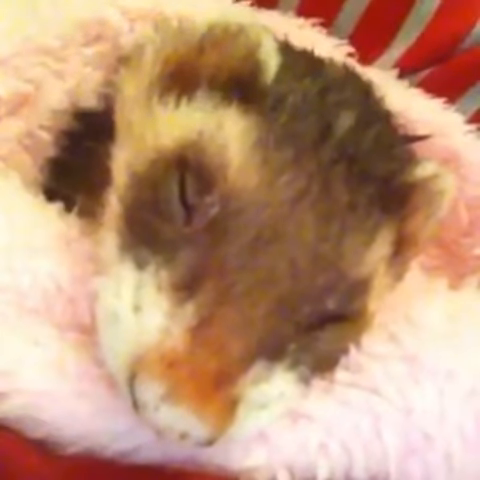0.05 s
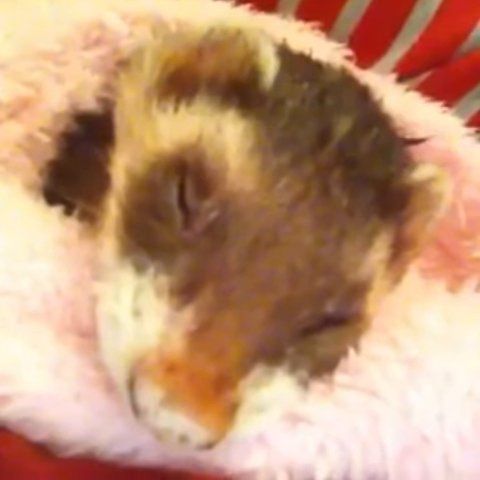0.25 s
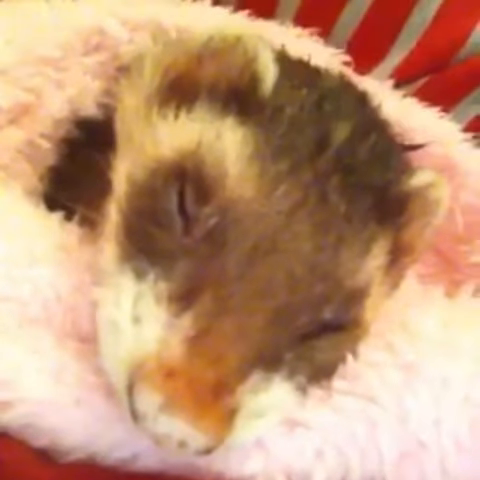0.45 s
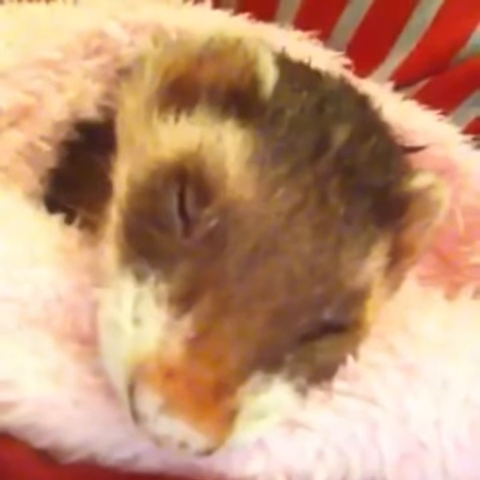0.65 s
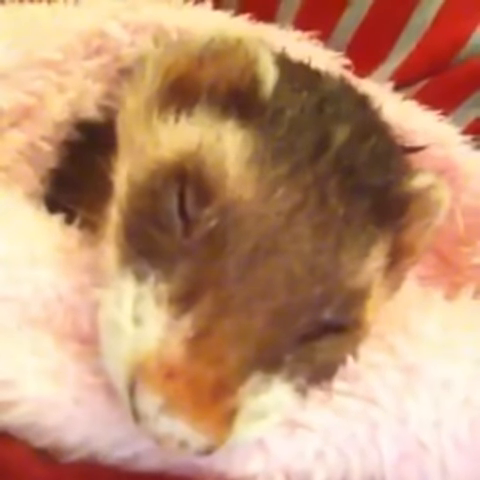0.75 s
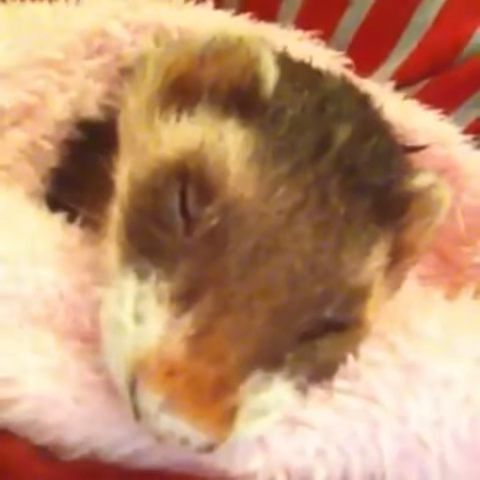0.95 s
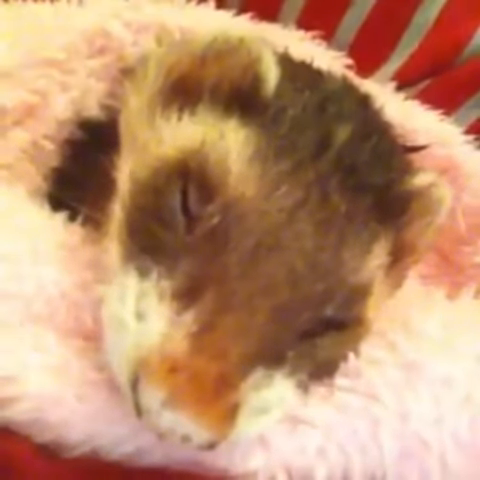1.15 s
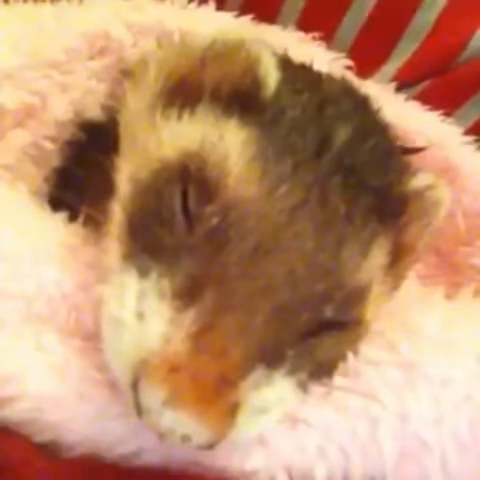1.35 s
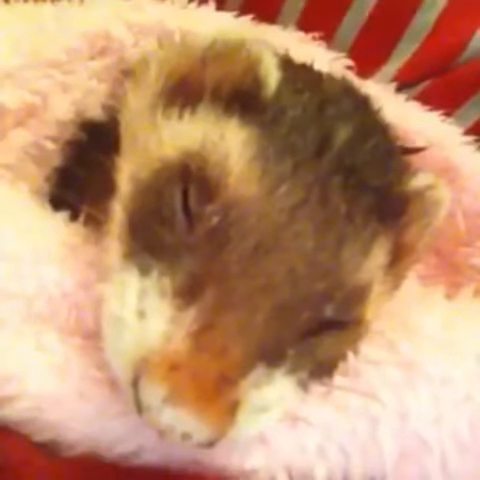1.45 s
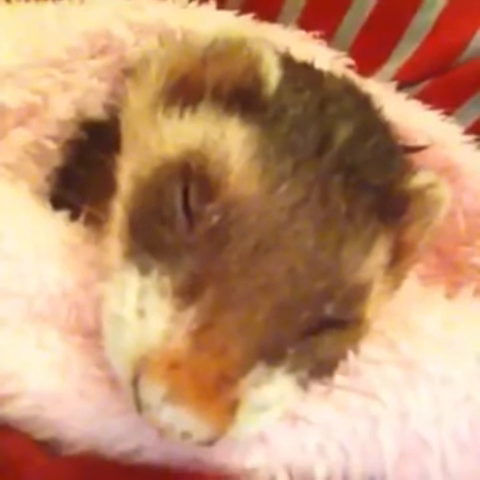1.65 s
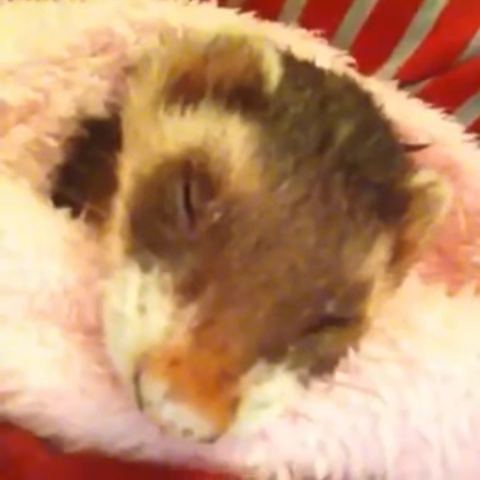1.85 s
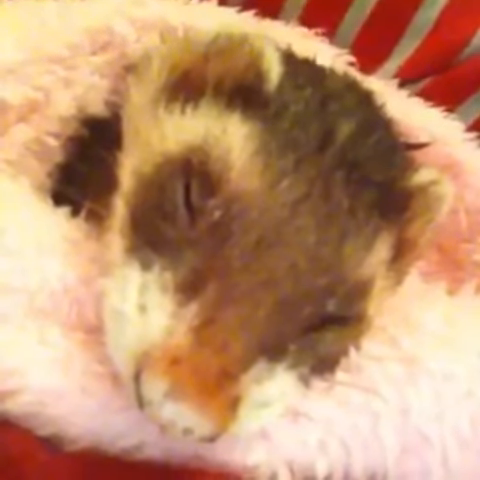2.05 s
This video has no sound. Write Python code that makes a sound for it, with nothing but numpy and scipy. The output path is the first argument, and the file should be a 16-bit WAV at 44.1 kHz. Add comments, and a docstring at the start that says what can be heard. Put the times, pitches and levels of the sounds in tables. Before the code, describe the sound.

Two soft, close snores come from a sleeping ferret, about a second apart, raspy and fluttering with tiny squeaks and nasal whistles. The second is longer and ends with a faint wet tick. Low hum and hiss continue indoors.

```python
"""Two small, close snores from a ferret asleep in its blanket, over a quiet room's mains hum and hiss.
Each starts as a short buzz of soft airway tissue, breaks into uneven flaps and squeaks, and ends
in a thin nasal whistle: falling the first time, rising and interrupted the second.
Air rasps and hisses through the nose; a faint wet tick and a small low rustle follow the last whistle."""
import sys
import numpy as np
from scipy import signal
from scipy.fft import rfft, irfft
from scipy.io import wavfile

SR = 44100
rng = np.random.default_rng(int(sys.argv[2]) if len(sys.argv) > 2 else 0)


def digitize_waveform(pressure):
    """Quantize a signal to 16-bit integers and store it at the path in sys.argv[1].

    Rows of a 2-D input are taken as channels; values are limited to [-1, 1].
    """
    field = np.atleast_2d(pressure).T
    bounded = np.clip(field, -1, 1)
    quanta = np.round(bounded * 32767).astype(np.int16)
    wavfile.write(sys.argv[1], SR, quanta)


N = 92610


def from_db(db):
    """Decibels to gain."""
    return 10 ** (np.asarray(db) / 20)


def unit_rms(x):
    """Scale to unit power."""
    return x / np.sqrt(np.mean(x ** 2) + 1e-20)


def drift(rate_hz):
    """Smooth random wander, unit RMS."""
    pole = np.exp(-2 * np.pi * rate_hz / SR)
    wander = signal.lfilter([1], [1, -2 * pole, pole * pole], rng.standard_normal(N + SR))
    return unit_rms(wander[SR:])


def gate(start_s, length_s, attack_s, release_s):
    """Rounded attack, hold, rounded release."""
    age_s = np.arange(N) / SR - start_s
    ramp = np.clip(np.minimum(age_s / attack_s, (length_s - age_s) / release_s), 0, 1)
    return np.sin(np.pi / 2 * ramp) ** 2


def progress(start_s, length_s):
    """0 to 1 over an event."""
    return np.clip((np.arange(N) / SR - start_s) / length_s, 0, 1)


def glide(start_s, length_s, from_hz, to_hz, arch_hz):
    """Pitch slide, bowed as the pressure swells and eases."""
    u = progress(start_s, length_s)
    return from_hz + (to_hz - from_hz) * u + arch_hz * np.sin(np.pi * u)


def noise(spectrum):
    """Unit-RMS noise shaped by rows of freq_hz, gain_db."""
    freq_hz, gain_db = np.transpose(spectrum)
    bins_hz = np.maximum(np.arange(N // 2 + 1) * SR / N, 1)
    gain = from_db(np.interp(np.log(bins_hz), np.log(freq_hz), gain_db))
    return unit_rms(irfft(rfft(rng.standard_normal(N)) * gain, N))


def vibration(pitch_hz, harmonics_db, jitter, shimmer_db, drift_hz):
    """Tissue oscillating in the airflow, unsteady in pitch and strength."""
    phase = 2 * np.pi * np.cumsum(pitch_hz * (1 + jitter * drift(drift_hz))) / SR
    wave = sum(from_db(db) * np.cos(k * phase) for k, db in enumerate(harmonics_db, 1))
    return np.sqrt(2) * wave * from_db(shimmer_db * drift(drift_hz))


def room():
    """Steady mains hum and room noise."""
    # mains lines: freq_hz, level_db
    lines = [(100, -64), (120, -78.5), (200, -75), (300, -67.5)]
    # room noise spectrum: freq_hz, gain_db
    spectrum = [(60, -19.5), (95, -11.5), (140, -10.5), (200, -4), (280, 2), (340, -3.5), (490, -6.5),
                (620, -11), (780, -11.5), (1150, -12), (1600, -16), (2200, -17.5), (3000, -20.5),
                (4200, -23), (7000, -24.5), (10000, -24)]
    t = np.arange(N) / SR
    hum = sum(np.sqrt(2) * from_db(db) * np.sin(2 * np.pi * (hz * t + rng.random())) for hz, db in lines)
    low_cut = signal.butter(1, 68.4, "high", fs=SR, output="sos")
    return hum + signal.sosfilt(low_cut, from_db(-56.5) * noise(spectrum))


def nostril_hiss(fade_db=-4.5):
    """Smooth, lingering turbulence at the nostrils."""
    # hisses: start_s, length_s, level_db
    hisses = [(0.225, .16, -59), (1.323, .52, -63)]
    # hiss spectrum: freq_hz, gain_db
    spectrum = [(1000, -6), (2000, -11.5), (3500, 2.5), (5500, 3.5), (7500, -2.5), (10000, 3)]
    envelope = np.zeros(N)
    for start_s, length_s, level_db in hisses:
        gain = from_db(level_db + fade_db * progress(start_s, length_s))
        envelope += gain * gate(start_s, length_s, attack_s=0.013, release_s=0.013)
    return envelope * noise(spectrum)


def buzzes():
    """Tissue vibrates evenly: the reedy start of each snore."""
    # buzzes: start_s, length_s, pitch_hz, level_db, slope_db_per_harmonic
    events = [(0.234, 0.031, 431, -44, -0.5), (1.3253, 0.0237, 589, -45, -3.5)]
    # harmonics before the slope: gain_db
    base_db = [1.3, -1.5, -17, -27, -36]
    out = np.zeros(N)
    for start_s, length_s, pitch_hz, level_db, slope_db in events:
        glide_hz = glide(start_s, length_s, pitch_hz, pitch_hz, arch_hz=10)
        harmonics_db = base_db + slope_db * np.arange(len(base_db))
        tone = vibration(glide_hz, harmonics_db, jitter=0.0046, shimmer_db=2.6, drift_hz=99)
        out += from_db(level_db) * gate(start_s, length_s, attack_s=0.007, release_s=0.0023) * tone
    return out


def rasp(flutter_db=2.0):
    """Air drawn through the nose, chopped by the moving tissue."""
    # breaths: start_s, length_s, level_db
    breaths = [(0.256, 0.21, -59.5), (1.318, 0.24, -57.5), (1.512, 0.19, -58.5)]
    # rasp spectrum: freq_hz, gain_db
    spectrum = [(60, -25), (170, -7), (340, 3), (530, -7), (850, -7), (1200, -3.5), (1600, -15.5),
                (2200, -14), (3200, -22), (10000, -31)]
    envelope = sum(from_db(level_db) * gate(start_s, length_s, attack_s=0.013, release_s=0.057)
                   for start_s, length_s, level_db in breaths)
    return envelope * noise(spectrum) * from_db(flutter_db * drift(rate_hz=130))


def squeaks():
    """The narrowed airway sounds short glides among the flaps."""
    # squeaks: start_s, length_s, from_hz, to_hz, arch_hz, level_db, overtone_db
    events = [(.265, .0085, 830, 1070, -5, -40.5, -21), (0.27, 0.0062, 1150, 1100, 28, -49, -25),
              (.301, .017, 730, 792, -6, -39, -18.5), (0.323, 0.013, 850, 840, 24, -38.5, -23.5),
              (0.345, .013, 820, 960, 71, -44, -19), (1.347, 0.0059, 860, 920, 3, -39.5, -19.5),
              (1.354, 0.0237, 1053, 940, 217, -47, -16), (1.3706, 0.0103, 950, 774, 0, -37, -28),
              (1.387, .007, 820, 877, 2, -49, -25), (1.456, 0.014, 1342, 1280, 0, -52, -22),
              (1.4943, 0.0085, 850, 994, 43, -41, -21)]
    out = np.zeros(N)
    for start_s, length_s, from_hz, to_hz, arch_hz, level_db, overtone_db in events:
        pitch_hz = glide(start_s, length_s, from_hz, to_hz, arch_hz)
        tone = vibration(pitch_hz, [0, overtone_db], jitter=0.011, shimmer_db=1.7, drift_hz=243)
        out += from_db(level_db) * gate(start_s, length_s, attack_s=0.0023, release_s=0.0023) * tone
    return out


def swells(times_s, levels_db, modes, spread_db=1.5, detune=0.056):
    """A Gaussian tone burst per mode at each time, never quite alike."""
    t, out = np.arange(N) / SR, np.zeros(N)
    for centre_s, level_db in zip(times_s, levels_db):
        near = np.abs(t - centre_s) < 0.015
        lag_s = t[near] - centre_s
        for mode_hz, gain_db, sigma_s in modes:
            peak = from_db(level_db + gain_db + spread_db * rng.standard_normal())
            freq_hz = mode_hz * (1 + detune * rng.standard_normal())
            envelope = peak * np.exp(-0.5 * (lag_s / sigma_s) ** 2)
            out[near] += envelope * np.cos(2 * np.pi * (freq_hz * lag_s + rng.random()))
    return out


def flaps_and_rustle():
    """Soft tissue flaps during the snores, then one small low rustle after the last whistle."""
    # flaps, with the rustle in the last row: time_s, low_db, high_db
    events = [(0.27, -39, -55), (.2760, -37, -41), (0.2809, -38, -44), (0.2916, -38.5, -35),
              (0.298, -38, -44), (0.301, -44, -45), (0.312, -43, -35.5), (0.32, -46, -40),
              (0.326, -39, -61), (0.338, -39, -51), (0.343, -54, -41.5), (.3540, -45, -47),
              (.3635, -72, -46.5), (0.3714, -42.5, -41.5), (0.38, -49, -51), (1.354, -43, -42),
              (1.3625, -40.5, -44), (1.376, -45, -50), (1.3825, -43, -43), (1.3899, -43, -37),
              (1.4014, -34.5, -45), (1.4145, -50, -39), (1.419, -38, -43), (1.427, -43, -52),
              (1.438, -41.5, -44), (1.4474, -56, -41), (1.4519, -36, -43), (1.4583, -41.5, -39),
              (1.474, -43, -56), (1.485, -43, -52), (1.496, -47, -49), (1.503, -41.5, -64),
              (1.5159, -43, -55), (1.691, -48, -54), (1.789, -42, -59)]
    # low and high resonances: freq_hz, gain_db, sigma_s
    low_modes = [(351, -1, 0.0014)]
    high_modes = [(775, 0.5, 0.0018), (1023, -8, 0.0015), (2160, -19.5, 0.0008)]
    times_s, low_db, high_db = np.transpose(events)
    return swells(times_s, low_db, low_modes) + swells(times_s, high_db, high_modes)


def whistles(tremble_hz=93.5, depth_db=1.5):
    """Nearly pure tones as the flow eases, trembling with the loose tissue."""
    # whistles: start_s, length_s, from_hz, to_hz, arch_hz, level_db, fade_db, release_s
    events = [(0.3729, 0.0653, 854, 603, -6.5, -42.5, -3, 0.033),
              (1.5221, 0.072, 871, 904, -28, -44.5, 0, 0.008),
              (1.593, 0.033, 870, 999, 1, -44.5, -3, 0.006), (1.625, 0.024, 932, 1017, -1, -46, -8, 0.0091),
              (1.648, .02, 953, 914, -7, -45.5, -1, .005)]
    # harmonics: gain_db
    harmonics_db = [0, -24]
    rate_hz = tremble_hz * (1 + 0.15 * drift(rate_hz=30))
    tremble_db = depth_db * np.sin(2 * np.pi * np.cumsum(rate_hz) / SR)
    out = np.zeros(N)
    for start_s, length_s, from_hz, to_hz, arch_hz, level_db, fade_db, release_s in events:
        pitch_hz = glide(start_s, length_s, from_hz, to_hz, arch_hz)
        tone = vibration(pitch_hz, harmonics_db, jitter=0.0065, shimmer_db=2.0, drift_hz=128)
        gain = from_db(level_db + fade_db * progress(start_s, length_s) + tremble_db)
        out += gain * gate(start_s, length_s, attack_s=0.0061, release_s=release_s) * tone
    return out


def wet_tick(start_s=1.686, level_db=-58, ring_hz=3450, t60_s=0.027):
    """Moisture clicks as the nostril clears: one damped sine."""
    age_s = np.maximum(np.arange(N) - int(start_s * SR), 0) / SR
    return from_db(level_db - 60 * age_s / t60_s) * np.sin(2 * np.pi * ring_hz * age_s)


def scene():
    """Two snores over the quiet room, mono."""
    ferret = nostril_hiss() + buzzes() + rasp() + squeaks() + flaps_and_rustle() + whistles()
    ferret += wet_tick()
    return (room() + ferret)[None]


def record(dry):
    """Steep treble cut."""
    cutoff_hz = 10250
    return signal.sosfilt(signal.ellip(12, 0.2, 70, cutoff_hz, fs=SR, output="sos"), dry)


dry = scene()
out = record(dry)
digitize_waveform(out)
```